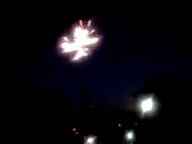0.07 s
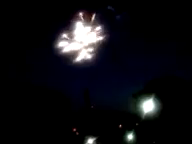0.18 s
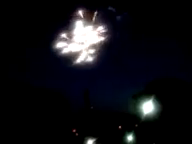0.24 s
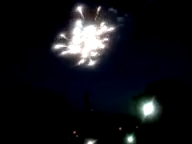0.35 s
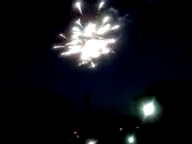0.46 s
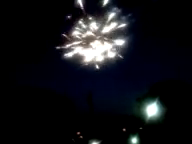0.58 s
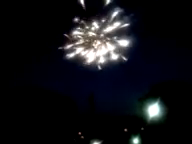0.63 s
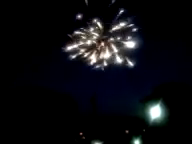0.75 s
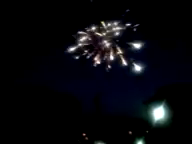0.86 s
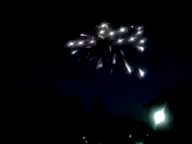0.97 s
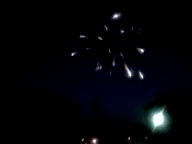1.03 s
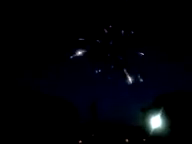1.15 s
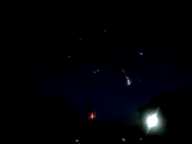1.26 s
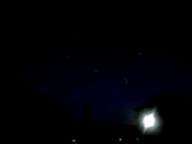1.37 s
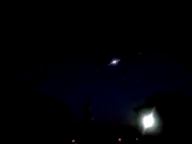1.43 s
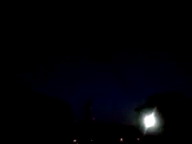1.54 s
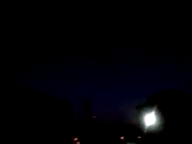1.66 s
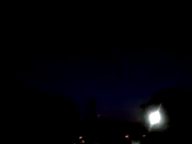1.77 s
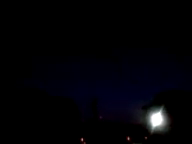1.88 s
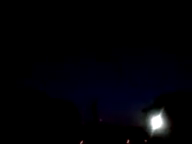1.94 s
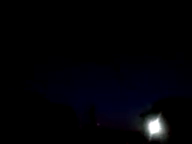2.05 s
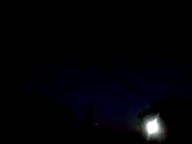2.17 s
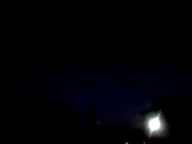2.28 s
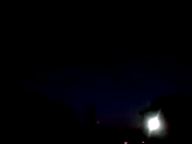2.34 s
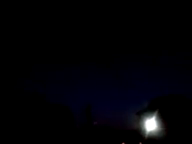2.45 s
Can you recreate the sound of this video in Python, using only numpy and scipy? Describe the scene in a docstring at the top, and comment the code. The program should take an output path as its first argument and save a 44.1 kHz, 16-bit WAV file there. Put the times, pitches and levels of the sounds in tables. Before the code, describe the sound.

Fireworks bang in quick succession, then crackle densely and end with one sharp crack.

```python
"""Firework shells burst at night over open ground: a quick string of bangs, each smeared by echoes.
Their stars (small burning pellets) then crackle in a swarm that swells in waves and dies away,
leaving one late sharp crack. Far shells thud over a rumble, and two faint whistles come and go.
The microphone picks up little treble and overloads on the loud parts."""
import sys
import numpy as np
from scipy import signal
from scipy.fft import rfft, irfft, next_fast_len
from scipy.io import wavfile

SR = 44100
rng = np.random.default_rng(int(sys.argv[2]) if len(sys.argv) > 2 else 0)


def materialize(psi):
    """Save the field psi as 16-bit PCM at rate SR to the path in sys.argv[1].

    A 1-D psi becomes a single channel; in a 2-D psi each row is a channel.
    """
    bounded = np.clip(np.atleast_2d(psi).T, -1, 1)
    quanta = np.round(bounded * 32767).astype(np.int16)
    wavfile.write(sys.argv[1], SR, quanta)


N = 110250
T = np.arange(N) / SR

# The tone colour of tiny pops. Each row: frequency in Hz, level in dB.
POP_COLOUR = [(30, -13), (120, -11), (300, -12.5), (600, -2.5), (950, 1), (1300, -0.5), (2000, 1),
              (2800, -0.5), (3400, 0)]
# The tone colour of one star's sharp crack. Each row: frequency in Hz, level in dB.
CRACK_COLOUR = [(60, -21), (400, -11), (1000, -5.5), (1400, -2.5), (1900, -1.5), (2600, -4), (3400, -3.5)]


def shell_bangs():
    """Each shell gives a blast of noise around its own pitch; short hollow tones glide inside."""
    # Each row: start in seconds, level in dB, rise in seconds, hold in seconds, pitch in Hz.
    bangs = [(0.2136, -1.5, 0.0023, 0.017, 880), (0.301, -7, .012, 0.019, 820),
             (0.403, -7.5, .008, 0.042, 850), (.528, -4, .006, .024, 950), (0.617, -12, 0.013, 0.057, 1000),
             (0.703, -10.5, 0.0056, 0.0089, 650)]
    # The broad noise under each blast's pitch. Each row: frequency in Hz, level in dB.
    blast_colour = [(30, -38), (120, -17.5), (230, -20.5), (340, -9), (600, -11), (1200, -9), (1700, -19),
                    (2400, -11), (3500, -14.5)]
    # Each row: start in seconds, length in seconds, first pitch in Hz, last pitch in Hz, level in dB.
    hollow_tones = [(0.22, 0.013, 514, 305, -1), (.232, 0.017, 894, 570, -5),
                    (0.306, 0.02, 854, 1170, -2.5), (0.321, .012, 421, 328, 0),
                    (.329, .019, 1020, 490, 0.5), (.416, 0.015, 607, 372, -3),
                    (.432, .017, 1078, 705, -5.5), (0.44, .018, 351.5, 266, -12),
                    (0.526, 0.033, 1076, 400, -6.5)]
    width_octaves = 0.72
    out = np.zeros(N)
    for start, db, rise, hold, pitch in bangs:
        hump = lambda hz: np.exp(-(np.log2((hz + 1) / pitch) / width_octaves) ** 2)
        gain = lambda hz: (hump(hz) + amp(along(blast_colour, hz))) * mic_band(hz)
        blast = unit(filtered(rng.standard_normal(N), gain))
        out += amp(db) * blast * envelope(start, rise, hold, fade=0.15)
    for start, length, from_hz, to_hz, db in hollow_tones:
        progress = np.clip((T - start) / length, 0, 1)
        cycles = np.cumsum(from_hz * (to_hz / from_hz) ** progress) / SR + rng.random()
        out += amp(db) * np.sin(np.pi * progress) * np.sin(2 * np.pi * cycles)
    return echoed(out, echo_db=-4.5)


def crackling_stars():
    """A swarm of tiny pops, with surges where many stars pop at once."""
    # The strength of the swarm. Each row: time in seconds, level in dB.
    swarm_levels = [(.2, -39.5), (.25, -20.5), (.45, -18.5), (.62, -17), (.76, -16.5), (.87, -12),
                    (.945, -16), (.98, -12), (1.03, -13.5), (1.08, -10), (1.14, -10), (1.175, -14.5),
                    (1.265, -5.5), (1.34, -14), (1.39, -10), (1.425, -16), (1.47, -17.5), (1.51, -9.5),
                    (1.595, -13.5), (1.645, -22), (1.75, -29.5), (1.86, -37), (2.0, -63)]
    # Each row: start in seconds, level in dB, hold in seconds.
    surges = [(0.846, -20.5, .015), (0.957, -15.5, 0.037), (1.051, -17.5, 0.026), (1.111, -12.5, 0.043),
              (1.185, -10, 0.026), (1.24, -13.5, 0.044), (1.293, -11, 0.023), (1.358, -9, .045),
              (1.489, -10.5, 0.055), (1.579, -9.5, 0.01), (1.695, -21, .012)]
    # Each row: frequency in Hz, level in dB.
    surge_colour = [(30, -25), (130, -8.5), (260, -9.5), (500, -4.5), (900, 2), (1400, -3), (2200, -6),
                    (3400, -0.5)]
    swarm_db, = curves(swarm_levels)
    swarm = echoed(amp(swarm_db) * coloured(pops(), POP_COLOUR), echo_db=-7.5)
    surge_gain = sum(amp(db) * envelope(start, 0.006, hold, fade=0.044) for start, db, hold in surges)
    return swarm + surge_gain * coloured(pops(), surge_colour)


def snapping_stars():
    """Single stars snap out of the swarm while it builds, some at set times and more at random."""
    # Each row: time in seconds, peak level in dB.
    clearest_snaps = [(.7825, -6.5), (.8335, -5), (.8458, -9), (.8628, -4.5), (.9052, -4), (0.937, -1.5),
                      (.9566, -2), (.969, -1), (1.022, -3), (1.0462, -2)]
    snaps_per_s, from_s, to_s = 120, 0.76, 1.33
    spikes = amp(-4.5) * (rng.random(N) < snaps_per_s / SR) * (T > from_s) * (T < to_s)
    for start, db in clearest_snaps:
        spikes[round(start * SR)] += amp(db)
    gain = lambda hz: amp(along(CRACK_COLOUR, hz)) * mic_band(hz)
    one_snap = filtered(1.0 * (T == 0), gain)
    return filtered(spikes, gain) / np.abs(one_snap).max()


def last_star():
    """One sharp crack bounces off the ground and walls and scatters off nearby things."""
    # The crack and its quick bounces. Each row: delay in seconds, level in dB.
    arrivals = [(0, 0), (.0016, -6), (.0046, -4.5), (.0061, -2.5), (0.0163, -5.5), (.0182, -5.5)]
    start = 1.8537
    spikes = np.zeros(N)
    for delay, db in arrivals:
        spikes[round((start + delay) * SR)] -= amp(db)
    crack = coloured(spikes, CRACK_COLOUR)
    crack = amp(-0.5) * crack / np.abs(crack).max()
    scatter = coloured(rng.standard_normal(N), CRACK_COLOUR)
    scatter *= amp(-21.5) * envelope(start, rise=0, hold=0.018, fade=0.072)
    return echoed(crack + scatter, echo_db=-6)


def far_fireworks():
    """Far shells thud dully over the rumble and faint crackle of the wider display."""
    # Each row: start in seconds, level in dB.
    far_shells = [(.008, -21.5), (.02, -26), (.06, -33), (.076, -26), (0.104, -23.5), (0.549, -12.5),
                  (0.661, -16.5), (.712, -15.5), (.79, -21.5), (1.695, -24), (2.075, -26.5), (2.089, -29),
                  (2.213, -28.5), (2.289, -30.5), (2.409, -33)]
    # The tone colours of thuds and rumble. Each row: frequency in Hz, level in dB.
    thud_colour = [(30, -48.5), (180, -22.5), (320, 5), (650, 0.5), (1100, -15), (1600, -24.5), (3400, -21)]
    rumble_colour = [(25, -17), (70, -17.5), (180, -10), (330, 0), (600, -2), (1050, -7.5), (1500, -11.5),
                     (3400, -34)]
    # Each row: time in seconds, rumble level in dB, crackle level in dB.
    far_levels = [(0, -27.5, -43), (.19, -28, -45.5), (1.9, -33.5, -46), (2.15, -33.5, -45.5),
                  (2.32, -35, -44), (2.44, -34, -33.5), (2.5, -33.5, -40)]
    rumble_db, crackle_db = curves(far_levels)
    thud_gain = sum(amp(db) * envelope(start, rise=0.0018, hold=0, fade=0.12) for start, db in far_shells)
    thuds = thud_gain * coloured(rng.standard_normal(N), thud_colour)
    rumble = amp(rumble_db) * coloured(rng.standard_normal(N), rumble_colour)
    crackle = amp(crackle_db) * coloured(pops(), POP_COLOUR)
    return thuds + rumble + crackle


def thin_whistle():
    """Two narrow bands of noise make an unsteady whistle that fades right at the start."""
    # Each row: pitch in Hz, level in dB.
    tones = [(2395, -31.5), (1020, -30.5)]
    half_width_hz = 58
    out = np.zeros(N)
    for pitch, db in tones:
        band = lambda hz: 1 / (1 + ((hz - pitch) / half_width_hz) ** 2)
        out += amp(db) * unit(filtered(rng.standard_normal(N), band))
    return out * envelope(start=0, rise=0, hold=0.046, fade=0.54)


def falling_whistle():
    """Under the crackle, a faint whistle swells and fades as its pitch falls."""
    start, length, from_hz, fall_hz_per_s = 1, 0.25, 1115, 440
    progress = np.clip((T - start) / length, 0, 1)
    cycles = np.cumsum(from_hz - fall_hz_per_s * length * progress) / SR
    return amp(-19) * np.sin(np.pi * progress) * np.sin(2 * np.pi * cycles)


def pops(per_second=1500, spread_db=3):
    """Sudden spikes of air pressure, random in time and size."""
    size = amp(spread_db * np.clip(rng.standard_normal(N), -2, 2))
    return (rng.random(N) < per_second / SR) * size * np.sign(rng.standard_normal(N))


def echoed(x, echo_db):
    """Add the long, blurred echo from trees and buildings."""
    # Each row: frequency in Hz, seconds the echo takes to fade by 60 dB.
    fade_times = [(100, 1.1), (500, 1.35), (1500, 1.55), (3500, 1.45)]
    hz, t, bands = signal.stft(rng.standard_normal(N), SR, nperseg=256)
    fading = amp(-60 * t / along(fade_times, hz)[:, None])
    _, tail = signal.istft(bands * fading, SR, nperseg=256)
    return x + amp(echo_db) * signal.fftconvolve(x, tail / np.linalg.norm(tail))[:N]


def mic_band(hz):
    """The microphone's gain, which falls steeply in the treble."""
    # Each row: frequency in Hz, level in dB.
    treble_fall = [(3350, 0), (3500, -4), (3700, -12), (4000, -22), (4250, -33), (4500, -48), (5200, -100)]
    return amp(along(treble_fall, hz))


def amp(db):
    """Turn decibels into a gain to multiply by."""
    return 10 ** (np.asarray(db) / 20)


def unit(x):
    """Scale to an average strength (rms) of 1."""
    return x / np.sqrt(np.mean(x ** 2) + 1e-20)


def along(points, hz):
    """Read between a table's rows, with frequency spaced in octaves."""
    frequencies, values = np.transpose(points)
    return np.interp(np.log(hz + 1), np.log(frequencies + 1), values)


def curves(rows):
    """Give one value per sample for each column after the time."""
    times, *columns = np.transpose(rows)
    return [np.interp(T, times, column) for column in columns]


def filtered(x, gain):
    """Turn each frequency of x up or down by gain(hz)."""
    size = 2 * next_fast_len(N)
    hz = np.fft.rfftfreq(size, 1 / SR)
    cepstrum = irfft(np.log(np.maximum(gain(hz), 1e-6)), size)
    # Folding onto the first half makes the filter ring after a pop, never before it.
    cepstrum[1:size // 2] *= 2
    cepstrum[size // 2 + 1:] = 0
    return irfft(rfft(x, size) * np.exp(rfft(cepstrum)), size)[:N]


def coloured(x, colour):
    """Give x a tone colour within the microphone's range, at strength 1."""
    return unit(filtered(x, lambda hz: amp(along(colour, hz)) * mic_band(hz)))


def envelope(start, rise, hold, fade):
    """Rise, hold, then drop 60 dB per fade time; all times are in seconds."""
    t = T - start
    return np.clip(t / max(rise, 1e-4), 0, 1) * amp(-60 * np.maximum(t - rise - hold, 0) / fade)


def scene():
    """Everything in the sky, in one channel."""
    near = shell_bangs() + crackling_stars() + snapping_stars() + last_star()
    return (near + far_fireworks() + thin_whistle() + falling_whistle())[None]


def record(dry):
    """Overload flattens the peaks, making all the high treble; then the lowest and highest sounds are cut."""
    ceiling, hardness, low_cut_hz, top_hz = 0.73, 17.2, 45, 16100
    clipped = dry / (2 + np.abs(dry / ceiling) ** hardness) ** (1 / hardness)
    size = next_fast_len(N + SR // 2)
    hz = np.fft.rfftfreq(size, 1 / SR)
    gain = hz / np.hypot(hz, low_cut_hz) * (hz < top_hz)
    return irfft(rfft(clipped, size) * gain, size)[..., :N]


dry = scene()
out = record(dry)
materialize(out)
```